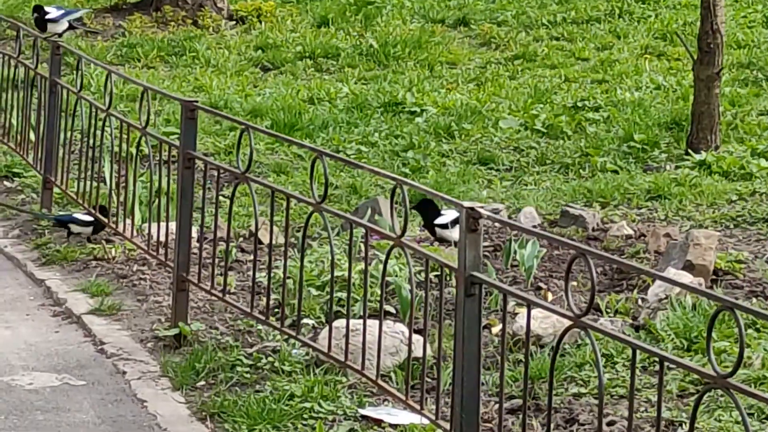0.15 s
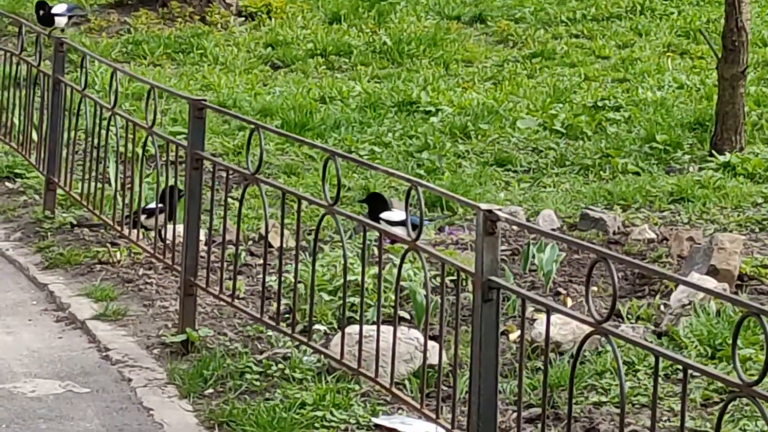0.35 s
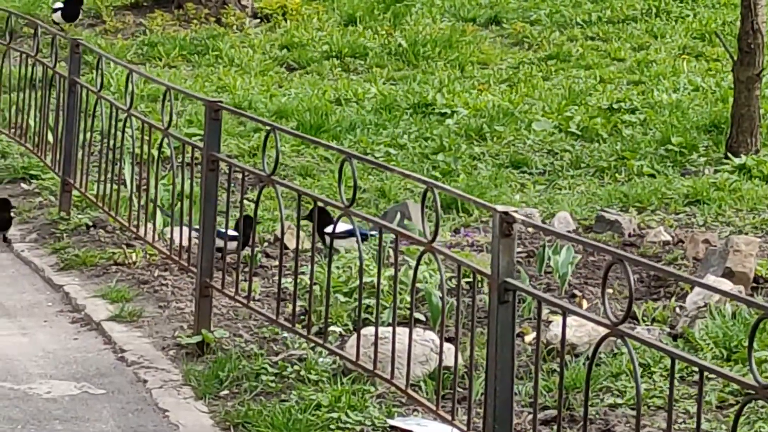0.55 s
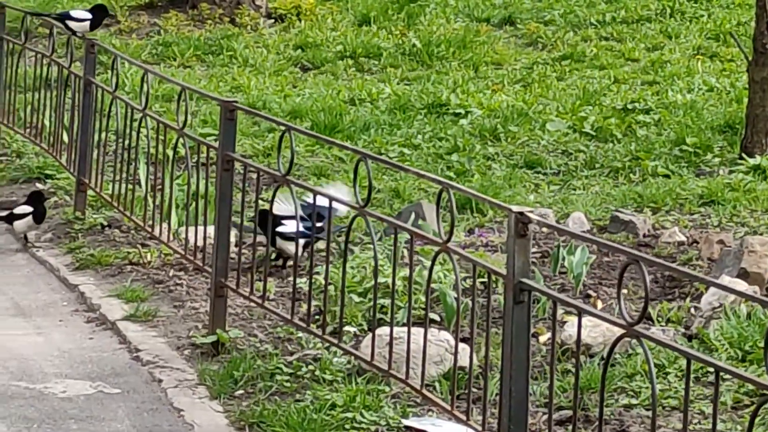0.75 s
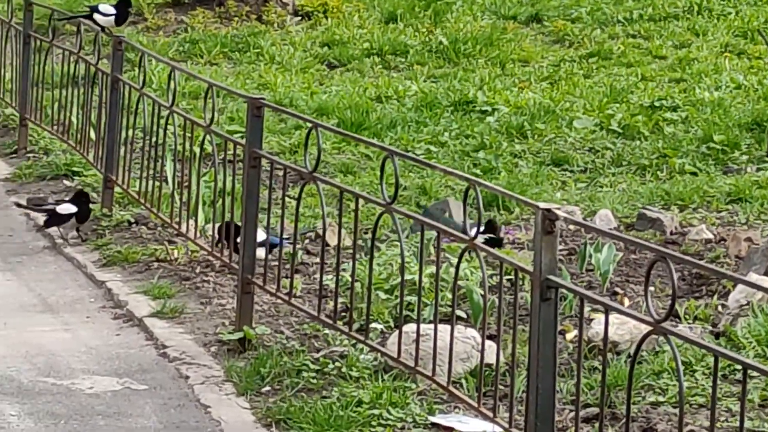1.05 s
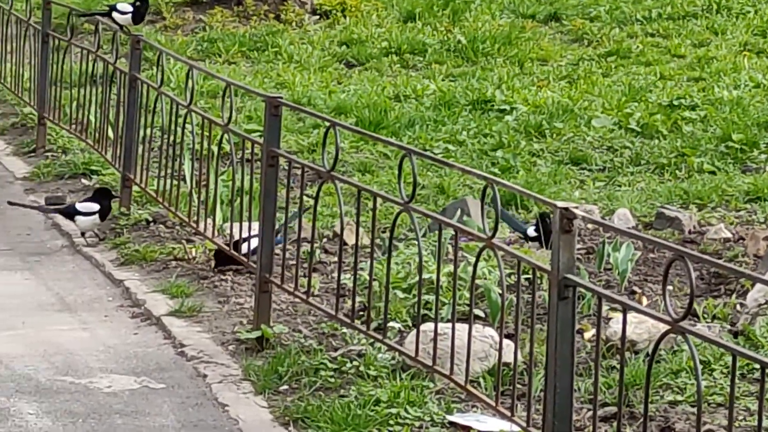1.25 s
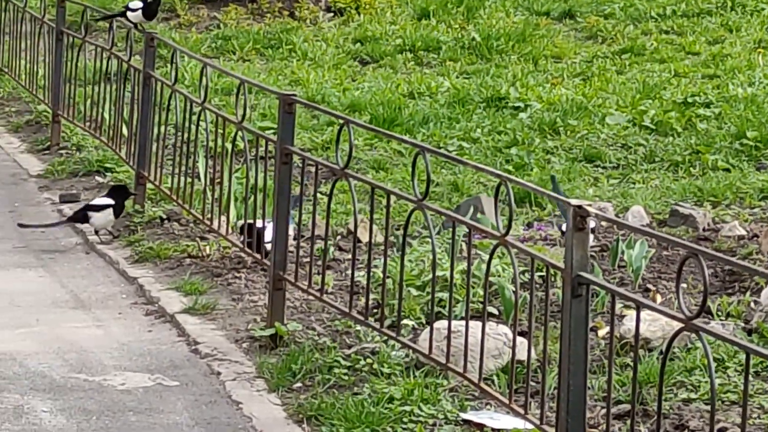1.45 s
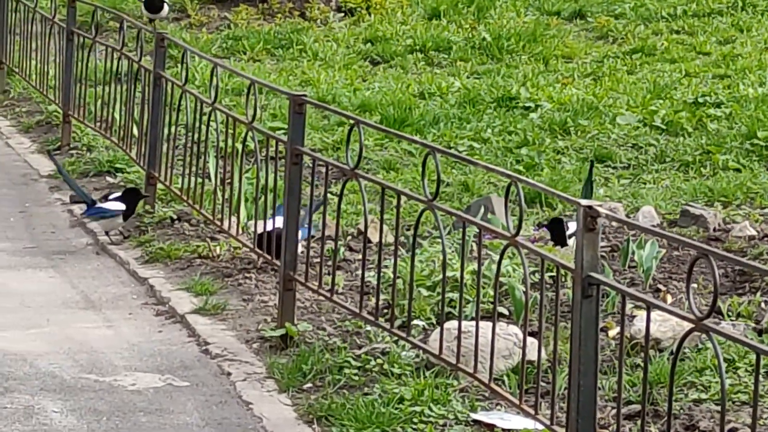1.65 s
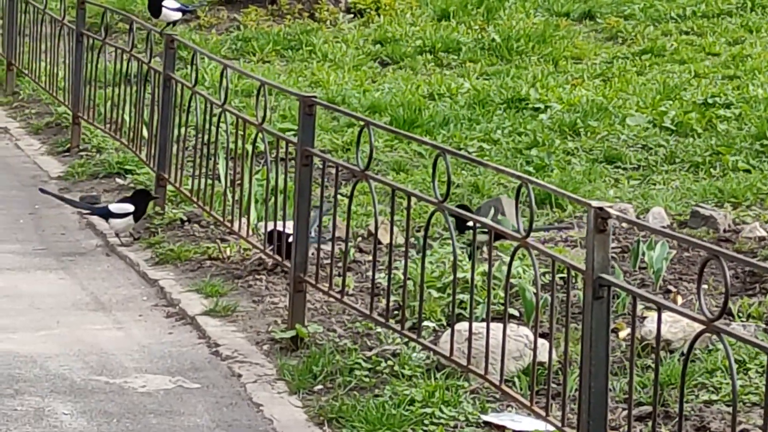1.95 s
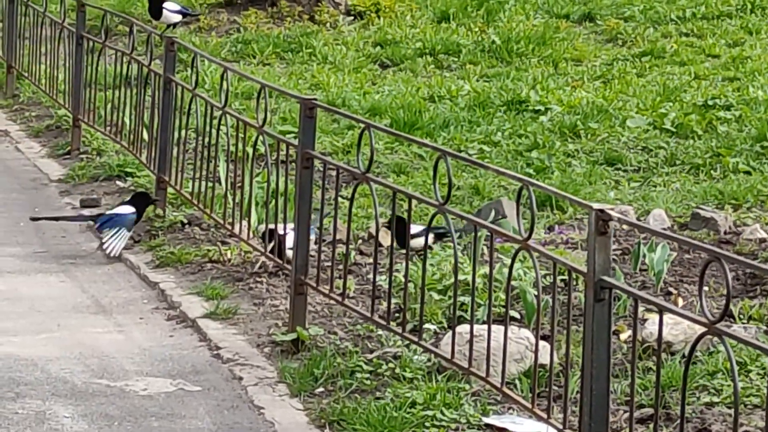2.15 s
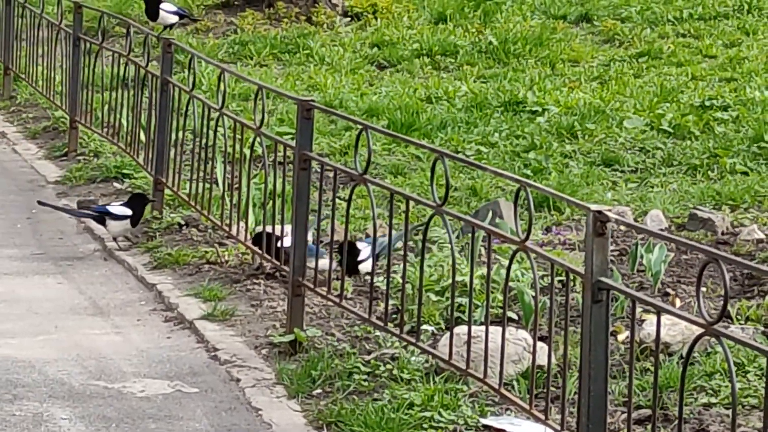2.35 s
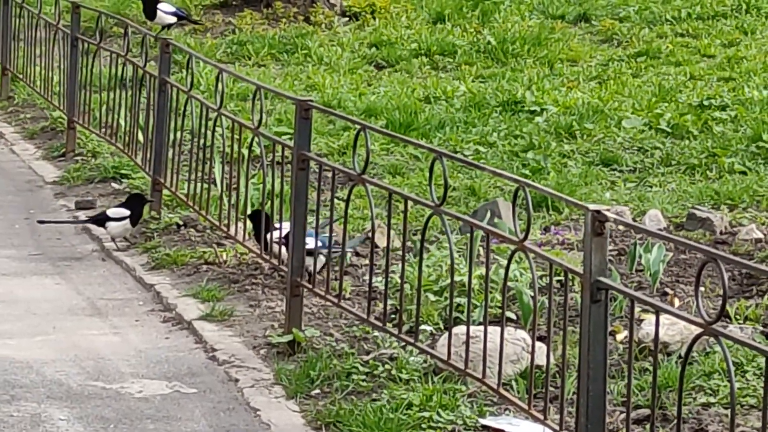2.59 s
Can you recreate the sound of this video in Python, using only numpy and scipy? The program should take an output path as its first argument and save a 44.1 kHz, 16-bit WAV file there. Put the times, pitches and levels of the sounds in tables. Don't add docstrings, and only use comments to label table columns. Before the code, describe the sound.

Magpies chatter harshly in a grassy yard while a passing vehicle rumbles low and fades away

```python
import sys
import numpy as np
from scipy import signal
from scipy.fft import rfft, irfft
from scipy.io import wavfile
from scipy.ndimage import uniform_filter1d

SR = 44100
rng = np.random.default_rng(int(sys.argv[2]) if len(sys.argv) > 2 else 0)


def persist_wave(psi):
    counts = np.round(np.clip(psi, -1, 1) * 32767).astype(np.int16)
    wavfile.write(sys.argv[1], SR, np.atleast_2d(counts).T)


def volts(x):
    e = np.asarray(x, float) / 20
    return 10 ** e


N = 119952


def rms_one(x):
    return x / np.sqrt(np.mean(x ** 2) + 1e-20)


def at_hz(points, hz):
    table_hz, value = np.transpose(points)
    return np.interp(np.log(hz), np.log(table_hz), value)


def drift(rate_hz, size):
    r = np.exp(-2 * np.pi * rate_hz / SR)
    settle = int(SR / rate_hz)
    wander = signal.lfilter([1], [1, -2 * r, r * r], rng.standard_normal(size + settle))
    return rms_one(wander[settle:])


def resonate(x, hz, width_hz):
    r = np.exp(-np.pi * width_hz / SR)
    zeros = np.array([1, 0, -1]) * (1 - r * r) / 2
    poles = [1, -2 * r * np.cos(2 * np.pi * hz / SR), r * r]
    return signal.lfilter(zeros, poles, x)


def add(out, s, x):
    i = int(s * SR)
    x, i = x[max(-i, 0):], max(i, 0)
    out[i:i + len(x)] += x[:len(out) - i]


def banded(edges_hz):
    white = rng.standard_normal((2, 2, N))
    for k, (low, high) in enumerate(zip(edges_hz, edges_hz[1:])):
        band = signal.butter(2, [low, high], "band", fs=SR, output="sos")
        yield np.sqrt(low * high), signal.sosfilt(band, white[k % 2])


def rasps(rows, throat):
    pulses_per_s, pulse_jitter, pulse_spread_db, breath = 800, 0.3, 2.5, 0.55
    flutter_hz, flutter_db, sag_per_s = 120, 1.8, 3.0
    attack_s, release_s, throat_opens_s, crest_db = 0.018, 0.011, 0.027, -7.5
    out, t = np.zeros(N), np.arange(SR // 8) / SR
    low, middle, upper = throat
    for s, db, low_db, upper_db, length_s, beak in rows:
        gaps = SR / pulses_per_s * np.exp(pulse_jitter * rng.standard_normal(len(t) // 8))
        at = np.cumsum(gaps).astype(int)
        pulses = np.zeros(at[-1] + len(t))
        pulses[at] = volts(pulse_spread_db * rng.standard_normal(len(at)))
        pulses = pulses[:len(t)]
        puffs = rms_one(signal.lfilter([1], [1, -0.985], pulses))

        voice = 0
        for group, group_db in ((low, low_db), (beak + middle, 0), (upper, upper_db)):
            for hz, width_hz, level_db in group:
                hz = hz * (1 + 0.025 * rng.standard_normal())
                hiss = puffs * rng.standard_normal(len(t))
                source = (1 - breath) * rms_one(pulses) + breath * hiss
                ring = resonate(resonate(source, hz, 1.3 * width_hz), hz, 1.3 * width_hz)
                ring = ring * np.sqrt(SR / width_hz / 4)
                opening = np.clip(0.28 + t / throat_opens_s + (hz > 3300), 0, 1)
                gain = volts(level_db + group_db + flutter_db * drift(flutter_hz, len(t)))
                voice = gain * ring * opening - voice

        warped_s = t * (1 + sag_per_s * (length_s - t) / 2)
        voice = np.interp(warped_s * SR, np.arange(len(t)), voice)
        power = np.mean(voice ** 2)
        local = np.abs(uniform_filter1d(voice ** 2, size=SR // 200))
        voice = voice * (power / (local + power / 10)) ** 0.25
        attack = np.sin(np.pi / 2 * np.clip(t / attack_s, 0, 1)) ** 2
        release = np.exp(-np.maximum(t - length_s, 0) / release_s)
        add(out, s - attack_s / 2, volts(db + crest_db) * attack * release * voice)
    return out


# (time [s], level [dB], low resonances [dB], upper resonances [dB], beak resonance [Hz])
SHRILL_RASPS = [(-.015, -32.5, 3, -1.7, 5200), (.050, -27, 2, -4.5, 5200), (0.173, -29.5, 2, -5.5, 4720),
                (0.266, -31.5, 0, 0.5, 5800), (0.346, -27.5, 0.5, 2, 5330), (0.479, -28, -13, -6, 4950),
                (.572, -27.5, -7.5, -13.5, 5200), (1.003, -39.5, 11.5, 5.5, 6760),
                (1.506, -34.5, -4.5, -4, 5200), (1.575, -29.5, -4.5, -7, 4800), (1.659, -31, -1, -5, 5200),
                (1.689, -38, -1.5, -4, 5000), (1.712, -49.5, -13, 1, 5700), (2.012, -33.5, -6, -0.5, 4220),
                (2.173, -37, 1, -7, 5200), (2.23, -28.5, -5, -4, 4830), (2.411, -44, -3.5, -3.5, 5200),
                (2.476, -36, -4, -11, 4800), (2.556, -30, -7.5, -10, 4330), (2.612, -42.5, 0, 1.5, 4930)]
# (frequency [Hz], width [Hz], level [dB])
SHRILL_THROAT = [
    [(1700, 296, 5), (2330, 250, 2.5), (2920, 900, 0)],
    [(6190, 1150, -4.5)],
    [(8960, 530, -1), (10400, 550, -6.5), (12270, 420, -5.5), (13250, 380, -14), (14600, 1500, -18)],
]


def shrill_rasps():
    length_s, beak_width_hz = 0.031, 750
    rows = [(*row, length_s, [(beak_hz, beak_width_hz, 0)]) for *row, beak_hz in SHRILL_RASPS]
    return rasps(rows, SHRILL_THROAT)


def placed(x, pan_db, lag_s):
    hz = np.arange(N // 2 + 1) * SR / N
    lagged = irfft(rfft(x) * np.exp(-2j * np.pi * hz * lag_s), N)
    return np.array([volts(pan_db / 2) * x, volts(-pan_db / 2) * lagged])


# (frequency [Hz], T60 [s])
YARD_T60 = [(1500, 0.33), (5000, 0.35), (12000, 0.27)]


def yard(x):
    level_db, delay_s, alike = -1.5, 0.0018, 0.13
    t, echo = np.arange(SR // 2) / SR, 0
    onset = np.clip(t / delay_s - 1, 0, 1)
    for hz, (mid, side) in banded(700 * 2 ** np.arange(0, 4.6, 0.5)):
        left = mid + side
        right = alike * left + np.sqrt(1 - alike ** 2) * (mid - side)
        pair = np.array([left, right])[:, :len(t)]
        echo = echo + pair * volts(-60 * t / at_hz(YARD_T60, hz)) * onset
    echo = echo / np.sqrt(np.sum(echo ** 2) / 2)
    return volts(level_db) * signal.fftconvolve(x[None], echo, axes=1)[:, :N]


# (frequency [Hz], left-right likeness [-1..1])
LIKENESS = [(30, 0.62), (80, 0.97), (180, 0.91), (350, 0.62), (700, 0.046), (2000, -0.36), (8000, -0.28)]


def background(spectrum, edges_hz):
    patchy_db, out = 2.0, 0
    for hz, (mid, side) in banded(edges_hz):
        alike = np.clip(at_hz(LIKENESS, hz), -0.99, 0.99)
        flicker = drift(6, N // 32 + 1).repeat(32)[:N]
        gain = volts(at_hz(spectrum, hz) + patchy_db * flicker)
        out = out + gain * (np.sqrt(1 + alike) * mid + np.sqrt(1 - alike) * side * [[1], [-1]])
    return rms_one(out)


# (time [s], road roar [dB], engine hum [dB])
DRONE = [(0, -36, -56), (.09, -32, -37), (.33, -33, -36), (.4, -32.5, -52), (.52, -34, -37.5),
         (.7, -34, -32.5), (.85, -34.5, -47), (.92, -32.5, -33.5), (.98, -33, -39), (1.1, -33.5, -35.5),
         (1.25, -37, -36), (1.36, -41, -33.5), (1.5, -41, -39.5), (1.8, -44, -48), (1.95, -41, -43),
         (2.3, -44.5, -65), (2.62, -43, -58), (2.72, -51, -60)]
# (frequency [Hz], band level [dB])
ROAR = [(40, -12), (70, -21), (110, -4), (190, -3), (310, -4.5), (450, -9.5), (560, -17), (1100, -24.5)]


def vehicle():
    hum_hz, hum_width_hz = 84.96, 6.4
    s, roar_db, hum_db = np.transpose(DRONE)
    t = np.arange(N) / SR
    waver = rms_one(resonate(rng.standard_normal(N), hum_hz, hum_width_hz))
    octave = rms_one(resonate(rng.standard_normal(N), 2 * hum_hz, 2 * hum_width_hz))
    hum = rms_one(np.sin(2 * np.pi * hum_hz * t) + 0.32 * waver + 0.2 * octave)
    roar = background(ROAR, 40 * 2 ** np.arange(0, 5.4, 1 / 3))
    return volts(np.interp(t, s, roar_db) + 2.5) * roar + volts(np.interp(t, s, hum_db)) * hum


# (frequency [Hz], band level [dB])
TOWN = [(120, 5), (400, -3), (600, 3), (900, -4.5), (1600, -6.5), (5500, -19.5), (12000, -37), (15500, -37)]


def town():
    level_db = -40.5
    return volts(level_db) * background(TOWN, 75 * 2 ** np.arange(0, 7.8, 1 / 3))


# (time [s], pitch [Hz], level [dB], length [s])
BOOMS = [(0.042, 238, -35, 0.21), (.1, 119.9, -30, 0.054), (.16, 168.8, -27.5, 0.12),
         (0.215, 315, -29.5, 0.067), (0.336, 170, -35, 0.08), (0.394, 128.6, -31, 0.057),
         (0.576, 198.5, -32, 0.058), (0.633, 300, -33.5, 0.093), (0.842, 459, -39, 0.085),
         (.93, 301.2, -30, 0.077), (0.99, 200.4, -29.5, 0.053), (1.03, 265.7, -33.5, 0.11),
         (1.11, 108, -33, 0.087), (1.15, 307, -35.5, 0.16), (1.42, 190.1, -34.5, .07),
         (1.67, 293.3, -39.5, .1), (2.353, 122, -34, 0.044), (2.605, 141, -37.5, .12)]


def booms():
    t, out = np.arange(N) / SR, np.zeros(N)
    for s, hz, db, length_s in BOOMS:
        swell = np.exp(-((t - s) / length_s * 2) ** 2)
        out += volts(db) * swell * np.sin(2 * np.pi * hz * t + rng.uniform(0, 2 * np.pi))
    return out


def whistles(rows, overtones):
    wobble, swell_power, flicker_db = 0.01, 0.9, 2
    out = np.zeros(N)
    for s, length_s, first_hz, last_hz, db in rows:
        u = np.arange(int(length_s * SR)) / (length_s * SR)
        hz = first_hz + (last_hz - first_hz) * np.sin(np.pi / 2 * u)
        hz = hz * (1 + wobble * drift(59.6, 1500)[:len(u)])
        phase = 2 * np.pi * np.cumsum(hz) / SR
        tone = 0
        for k in range(1, 7):
            flicker = flicker_db * drift(58, 1500)[:len(u)] * (k > 1)
            gain = volts(at_hz(overtones, k * hz) + flicker) * (k * hz < 11000)
            tone = tone + gain * np.sin(k * phase)
        swell = np.minimum(2 * u, 1) ** swell_power
        cutoff = np.clip((1 - u) / 0.15, 0, 1)
        add(out, s, volts(db + 2) * tone * swell * cutoff)
    return out


# (time [s], length [s], first pitch [Hz], last pitch [Hz], level [dB])
DEEP_WHISTLES = [(.398, 0.033, 2000, 1930, -44), (.464, 0.026, 1520, 1668, -32),
                 (.686, 0.02, 1950, 2070, -25.5), (.752, 0.033, 1493, 1680, -33),
                 (.982, 0.027, 2650, 3050, -17), (1.004, 0.0117, 2960, 2290, -24),
                 (1.213, 0.016, 2010, 2054, -27.5), (1.276, 0.033, 1566, 1649, -31),
                 (1.381, 0.009, 2350, 2340, -22), (1.622, 0.023, 1564, 1565, -31),
                 (1.852, 0.0216, 1910, 2120, -24.5), (1.920, 0.023, 1560, 1690, -27),
                 (2.015, .011, 2360, 2300, -25), (2.026, 0.008, 1520, 1570, -39),
                 (2.15, 0.022, 2180, 1840, -33), (2.221, 0.02, 1586, 1570, -30),
                 (2.385, 0.032, 1824, 1980, -33.5), (2.459, 0.023, 1490, 1620, -30),
                 (2.684, 0.0126, 3620, 2850, -24.5)]
# (frequency [Hz], level [dB])
DEEP_OVERTONES = [(1600, -1), (2000, -17), (3200, -20), (4000, -23), (5000, -36), (7200, -36), (8200, -18),
                  (9000, -44)]


def deep_whistles():
    return whistles(DEEP_WHISTLES, DEEP_OVERTONES)


# (time [s], level [dB], low resonances [dB], upper resonances [dB], length [s])
DEEP_RASPS = [(0.4157, -25, 4.5, 1, 0.021), (0.48, -26.5, 4, -5, 0.035), (0.571, -26.5, -25, -1, 0.02),
              (0.708, -19, -10, -0.5, 0.018), (0.78, -18.5, -5, 1.5, 0.014),
              (0.857, -20, -11.5, 0.5, 0.033), (0.937, -26, 3.5, 4, 0.029), (1, -27.5, 5.5, 8, 0.029),
              (1.231, -23, 2.5, -2, 0.021), (1.2995, -23.5, 3.5, -3.5, 0.026), (1.3923, -25, 4, 1.5, 0.027),
              (1.506, -28, -15, -1, 0.023), (1.5818, -25.5, 3, 2, 0.02), (1.645, -20.5, -2.5, 0, 0.017),
              (1.866, -26.5, 2, 6, 0.03), (1.9406, -22.5, 2.5, 2.5, 0.0214),
              (2.032, -19.5, -2.5, -2, 0.019), (2.165, -26.5, 3.5, 5.5, 0.023),
              (2.2367, -19.5, -3.5, 1.5, 0.019), (2.4063, -25.5, 5.5, 5.5, 0.024),
              (2.479, -25, 1, 2.5, 0.029), (2.568, -29, 4.5, 5, 0.022)]
# (frequency [Hz], width [Hz], level [dB])
DEEP_THROAT = [
    [(1040, 870, -14), (1654, 330, 1)],
    [(2340, 396, -0.5), (3040, 650, -11.5)],
    [(4030, 920, -9.5), (5200, 1250, -15.5), (6260, 1800, -20), (7060, 290, -19.5), (9270, 2400, -13),
     (12070, 690, -17.5)],
]


def deep_rasps():
    return rasps([(*row, []) for row in DEEP_RASPS], DEEP_THROAT)


# (time [s], length [s], first pitch [Hz], last pitch [Hz], level [dB])
SHRILL_WHISTLES = [
    (.561, 0.024, 5370, 4890, -37),
    (1.488, .018, 5060, 4450, -40.5),
    (2.617, 0.0096, 5200, 5000, -45),
    (1.496, 0.012, 3430, 2640, -38.5),
    (1.563, 0.0215, 1553, 1725, -41),
    (2.229, 0.026, 1510, 1700, -44.5),
]
# (frequency [Hz], level [dB])
SHRILL_OVERTONES = [(1700, 5), (3200, -16), (5000, 0.5), (6700, -7.5), (8500, -29), (11000, -9)]


def shrill_whistles():
    return whistles(SHRILL_WHISTLES, SHRILL_OVERTONES)


def scene():
    whistle_wash_db = -6
    shrill, deep = shrill_rasps(), deep_rasps()
    shrill_clear, deep_clear = shrill_whistles(), deep_whistles()
    birds = placed(shrill + shrill_clear, pan_db=5.5, lag_s=-0.000026)
    birds = birds + placed(deep + deep_clear, pan_db=3.5, lag_s=-0.00005)
    wash = yard(deep + shrill + volts(whistle_wash_db) * (deep_clear + shrill_clear))
    return birds + wash + vehicle() + booms() + town()


def roll_off(x):
    return signal.sosfilt(signal.butter(12, 15730, fs=SR, output="sos"), x)


# (frequency [Hz], left over right [dB])
LEAN = [(60, 0), (350, 1.5), (1400, 2.5), (3000, -1.9), (5000, -2.5), (8000, 15), (11500, -11),
        (14000, -11)]
# (frequency [Hz], width [Hz], level [dB])
PORT_DIPS = [(3380, 130, -5), (7110, 140, -5), (10330, 230, 0.5)]


def record(dry):
    hz = np.arange(1, N // 2 + 2) * SR / N
    dips = sum(db * np.exp(-((hz - dip_hz) / width_hz) ** 2) for dip_hz, width_hz, db in PORT_DIPS)
    lean = at_hz(LEAN, hz) * np.array([[0.5], [-0.5]])
    heard = irfft(rfft(dry, axis=1) * volts(lean + dips), N, axis=1)
    bass_cut = signal.butter(2, 55, "high", fs=SR, output="sos")
    return roll_off(signal.sosfilt(bass_cut, heard))


dry = scene()
out = record(dry)
persist_wave(out)
```